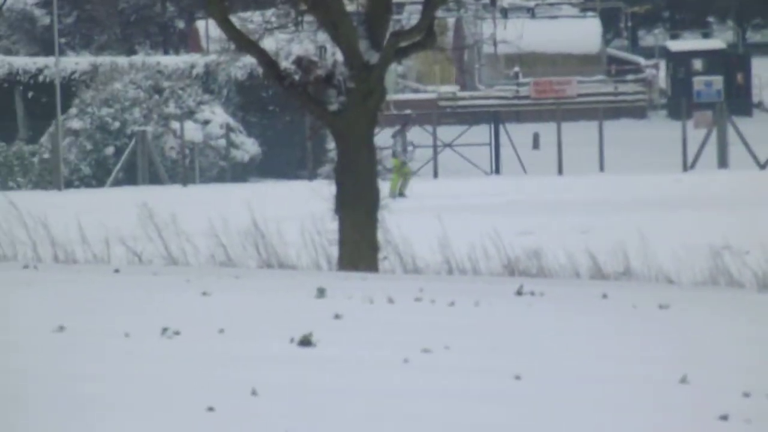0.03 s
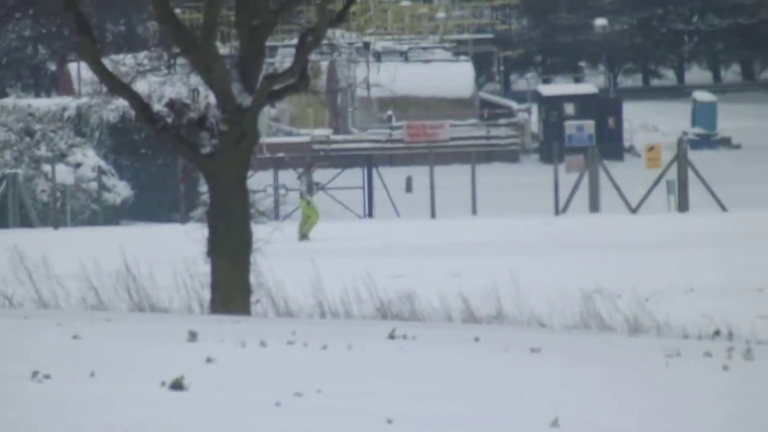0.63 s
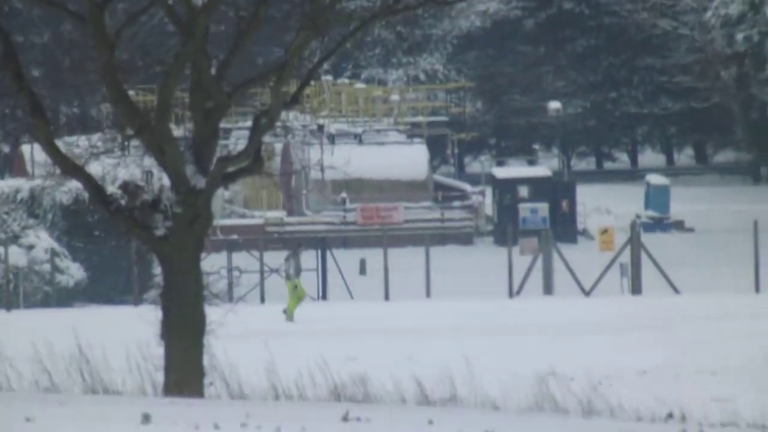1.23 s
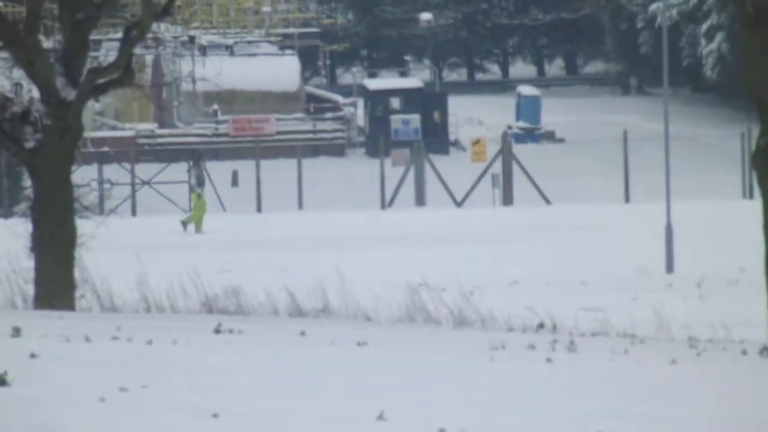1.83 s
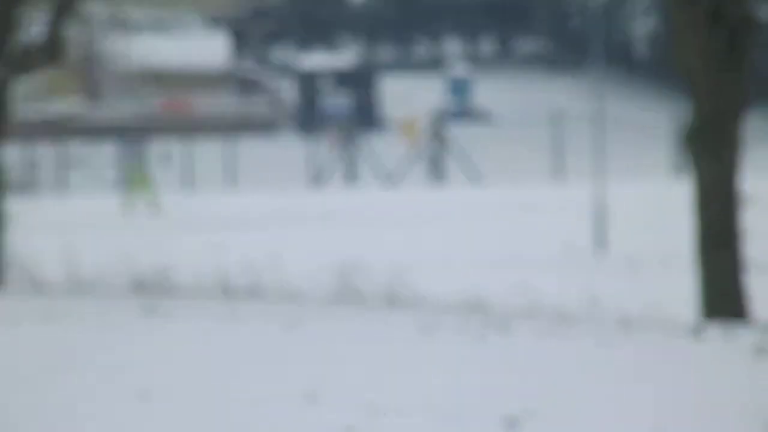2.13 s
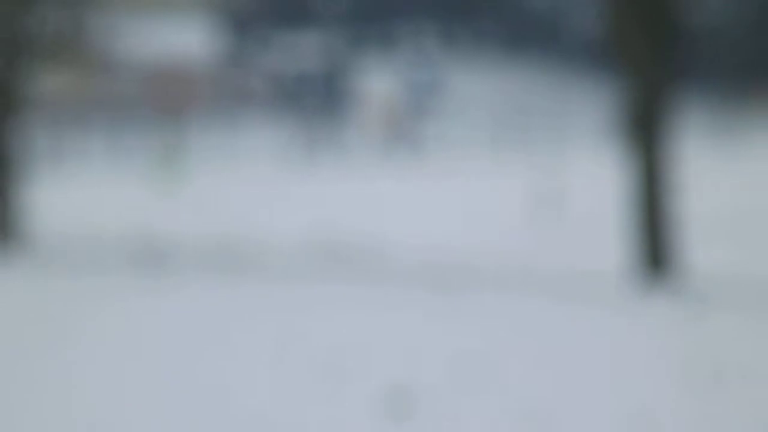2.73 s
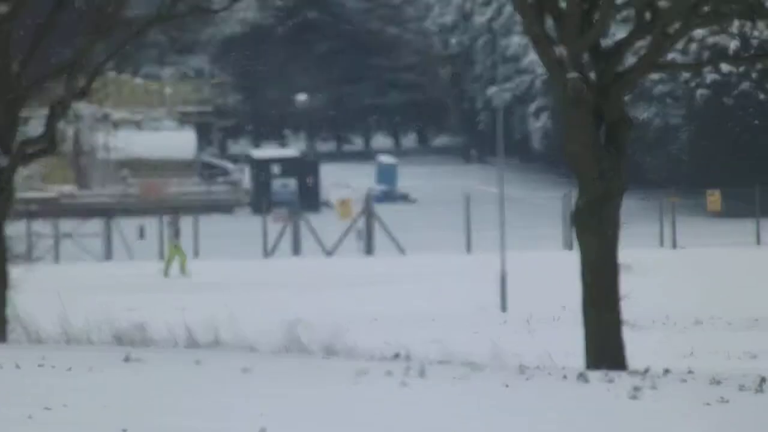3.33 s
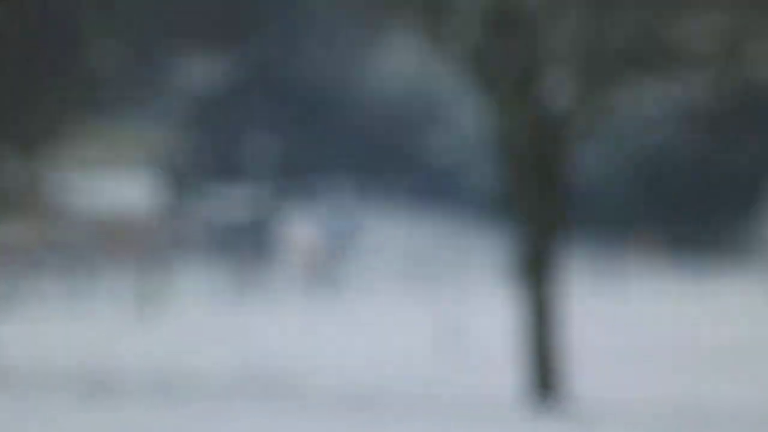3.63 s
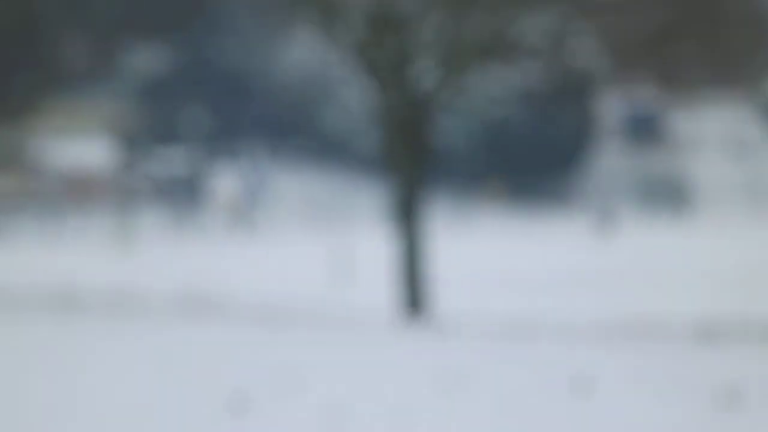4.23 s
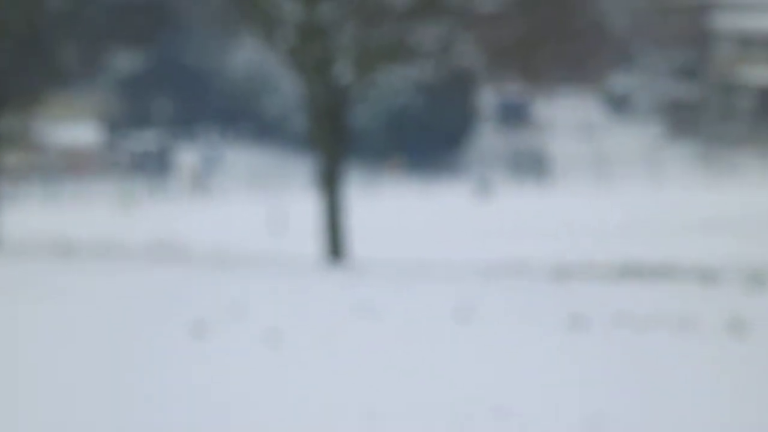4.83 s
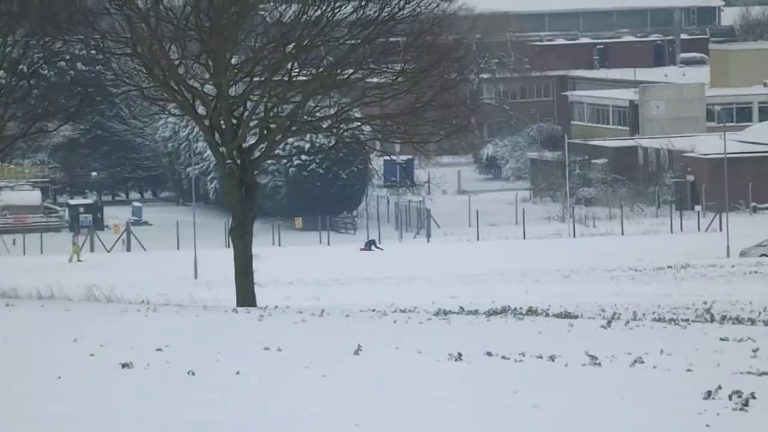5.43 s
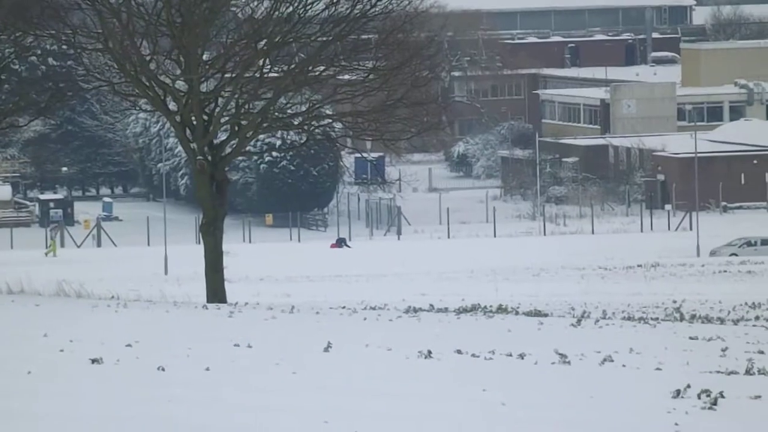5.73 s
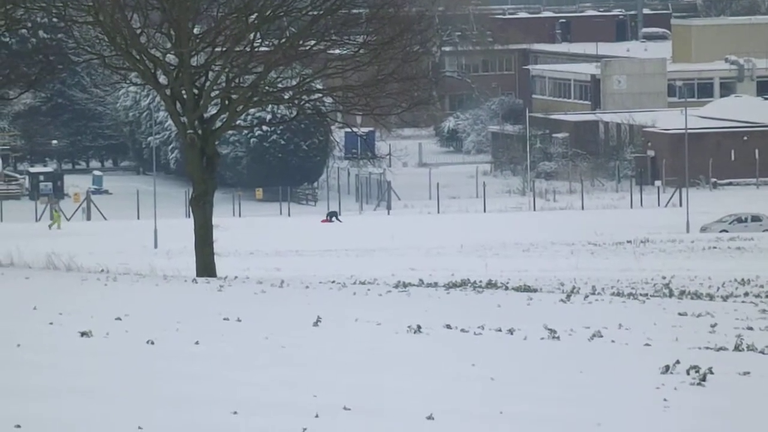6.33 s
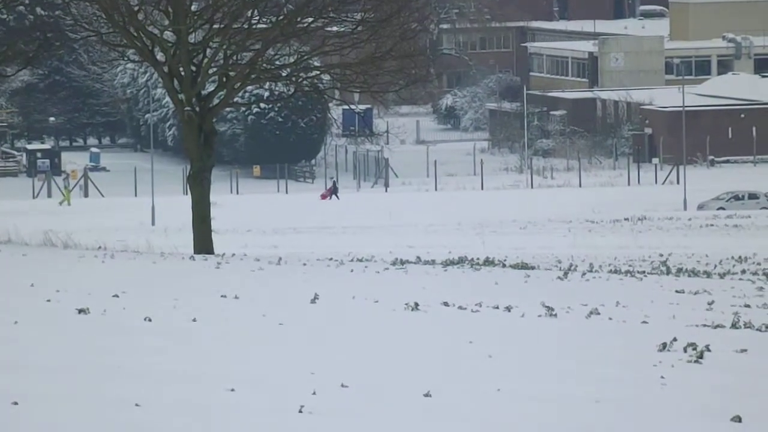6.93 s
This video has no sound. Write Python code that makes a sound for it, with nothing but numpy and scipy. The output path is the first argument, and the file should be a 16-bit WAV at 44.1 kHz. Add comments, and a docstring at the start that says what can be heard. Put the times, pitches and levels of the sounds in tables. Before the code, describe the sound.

A steady hiss with a faint hum runs throughout. A camera button clicks down and up, followed by light taps on the case. The focus motor buzzes briefly, then the zoom motor starts with a knock and whirrs. Two more short buzzes lead into a longer, rattling zoom that rubs harder and clacks against its stop. One small buzz follows. Everything is very close, heard through the camera's own case outdoors.

```python
"""A steady hiss, a button click, then the buzz, whirr and rattle of a compact camera's lens at work.
The camera hears itself through its case while it films a snowy field. A stepper motor buzzes the
focus once per frame, a geared motor whirrs the zoom, and a loose wheel chatters across its play.
The lens carriage knocks as it starts or halts; at last the barrel rubs tight and hits its end stop."""
import sys
import numpy as np
from scipy import signal
from scipy.fft import rfft, irfft
from scipy.io import wavfile
from scipy.ndimage import uniform_filter1d

SR = 44100
rng = np.random.default_rng(int(sys.argv[2]) if len(sys.argv) > 2 else 0)


def waveform_to_disk(signal):
    """Save audio, clipped to [-1, 1], as 16-bit WAV at the path in sys.argv[1]."""
    frames = np.transpose(np.atleast_2d(signal))
    scaled = np.clip(frames, -1, 1) * 32767
    samples = np.round(scaled).astype(np.int16)
    wavfile.write(sys.argv[1], SR, samples)


N = 317520
TIME = np.arange(N) / SR

# resonances of the microphone port and the case around it (frequency [Hz], width [Hz], lift [dB])
PORT_MODES = [(260, 35, 5), (396, 66, 3.5), (982, 258, 24.5), (2433, 115, 4), (3140, 380, 8),
              (3910, 337, 16.5), (4980, 520, 7), (6840, 97, 9), (8620, 740, 11), (9850, 1720, 8)]
# resonances of the case under the fingers (frequency [Hz], width [Hz], lift [dB])
CASE_MODES = [(982, 280, 22.5), (1173, 49, 13), (3740, 200, 5)]
# resonances of the lens barrel (frequency [Hz], width [Hz], lift [dB])
BARREL_MODES = [(997, 170, 22.5), (1230, 34, 6.5), (1330, 64, -6.5), (1560, 200, 2.5), (1740, 92, -7.5),
                (2053, 77, 4), (2180, 99, -10.5), (3096, 2330, 27.5), (3715, 140, -9.5), (3994, 93, 0.5),
                (4600, 300, -3.5), (4980, 190, 4), (5390, 140, 6), (8250, 820, 15), (9680, 610, 16)]
# runs of the focus motor (start [s], end [s], level [dB], peak of the tick at each end [dB])
FOCUS_RUNS = [(2.022, 2.28, -27.5, -19.5), (2.984, 3.154, -33, -22), (3.303, 3.485, -29.5, -21.5),
              (5.304, 5.387, -34.5, -20)]
# force spectrum of the loose wheel's strikes (frequency [Hz], level [dB])
WHEEL_FORCE = [(300, -42), (1500, -26.5), (2700, -22), (2980, -1), (3100, -3.5), (3175, 1.5), (3260, 3.5),
               (3420, -19), (3750, -0.5), (4500, -19), (6400, -19.5), (9700, -18.5), (15000, -42)]


def undb(db):
    """Decibels to gain."""
    return 10 ** (np.asarray(db) / 20)


def unit(x):
    """Scale to rms 1."""
    return x / np.sqrt(np.mean(x ** 2))


def walk(rate_hz):
    """Random drift with rms 1 that takes a new turn rate_hz times a second."""
    return unit(np.interp(TIME * rate_hz, np.arange(N), rng.standard_normal(N)))


def fader(rows):
    """Gain that follows (time [s], level [dB]) rows and holds at both ends."""
    return undb(np.interp(TIME, *np.transpose(rows)))


def envelope(rows):
    """Smoothed gain along (time [s], level [dB]) rows, silent outside them."""
    db = np.interp(TIME, *np.transpose(rows), left=-200, right=-200)
    return uniform_filter1d(undb(db), size=130)


def running(start, end, attack_s, release_s):
    """Gain of something that comes up to speed, holds and runs down."""
    attack = 1 - np.exp(-np.maximum(TIME - start, 0) / attack_s)
    return attack * np.exp(-np.maximum(TIME - end, 0) / release_s)


def swells(rows):
    """Gain of bell-shaped swells from (time [s], length [s], level [dB]) rows."""
    return sum(undb(db) * np.exp(-(2 * (TIME - s) / length) ** 2) for s, length, db in rows)


def ride_band(x, kind, hz, gain):
    """Ride the gain of one frequency band and leave the rest alone."""
    band = signal.sosfiltfilt(signal.butter(2, hz, kind, fs=SR, output="sos"), x)
    return x + band * (gain - 1)


def response(force, modes, size=4096):
    """Impulse response of a force spectrum lifted by a body's resonances."""
    hz = np.arange(size // 2 + 1) * SR / size + 1
    force_hz, force_db = np.transpose(force)
    db = np.interp(np.log(hz), np.log(force_hz), force_db)
    db += sum(lift / (1 + (2 * (hz - centre) / width) ** 2) for centre, width, lift in modes)
    # minimum phase: the ring follows the hit
    cepstrum = irfft(np.log(undb(db)))
    cepstrum[1:size // 2] *= 2
    cepstrum[size // 2 + 1:] = 0
    return irfft(np.exp(rfft(cepstrum)))


def ring(drive, force, modes):
    """Pass an excitation through a body; rms 1."""
    return unit(signal.fftconvolve(drive, response(force, modes))[:N])


def pulses(times, sizes):
    """Clicks placed between samples by a short windowed sinc."""
    out = np.zeros(N)
    index = (times * SR).astype(int)[:, None] + np.arange(-3, 5)
    offset = index - times[:, None] * SR
    np.add.at(out, index % N, sizes[:, None] * np.sinc(offset) * np.sinc(offset / 4))
    return out


def blows(hits, force, modes, scrape, rise_s, size=2048):
    """Each blow is a click and a dying chatter of the contact, ringing a body."""
    out, impulse = np.zeros(N), response(force, modes)
    for s, db, decay in hits:
        chatter = np.exp(-TIME[:size] / decay) * (1 - np.exp(-TIME[:size] / rise_s))
        contact = scrape * rng.standard_normal(size) * chatter
        contact[0] += 1
        sound = signal.fftconvolve(contact, impulse)
        start = int(s * SR)
        out[start:start + len(sound)] += undb(db) * sound / np.abs(sound).max()
    return out


def snaps(hits, force, modes, width_hz, lift_db, scrape, rise_s):
    """Blows whose main resonance moves with the place of contact."""
    return sum(blows([(s, db, decay)], force, modes + [(hz, width_hz, lift_db)], scrape, rise_s)
               for s, db, decay, hz in hits)


def port_hiss(rumble_hz=90, gust_db=3.5, flutter_hz=(850, 1150), flutter_db=2.2):
    """Hiss coloured by the microphone port; its rumble swells unevenly and its mids flutter."""
    # noise spectrum that drives the port (frequency [Hz], level [dB])
    spectrum = [(10, -7.5), (27, 1), (58, 2.5), (80, -5), (110, -2.5), (150, -7.5), (300, -5), (450, -13),
                (560, -10.5), (700, -16), (1700, -11), (2800, -2), (4400, -10.5), (5700, -6), (6400, -16),
                (10000, -25.5), (15000, -26.5)]
    # base level of the hiss (time [s], level [dB])
    level = [(0, -41.5), (.9, -39.5), (1.25, -39.5), (1.6, -39), (3.2, -38.5), (5.5, -39), (7.2, -39.5)]
    # the band around 3 kHz against the rest (time [s], lift [dB])
    presence = [(.55, 5), (.65, 5.5), (1.0, 3), (1.08, 1), (1.44, -2), (1.52, 3), (5.5, 3), (6.1, 1.5),
                (6.7, 2.5), (7.0, 4)]
    noise = rng.standard_normal(N) * undb(.5 * walk(9.9))
    hiss = envelope(level) * ring(noise, spectrum, PORT_MODES)
    hiss = ride_band(hiss, "bandpass", (2400, 3700), fader(presence))
    hiss = ride_band(hiss, "lowpass", rumble_hz, undb(gust_db * walk(11)))
    return ride_band(hiss, "bandpass", flutter_hz, unit(undb(flutter_db * walk(22))))


def hums(flutter_db=3, drift_rad=.98, whistle_hz=8021, coil_hz=93.7):
    """Faint tones waver, a thin electrical whistle comes and goes, and the iris coil hums."""
    # constant hums and tones (frequency [Hz], mean level [dB])
    partials = [(27, -57), (49, -60), (100, -67), (224, -67.5), (278, -66), (288, -58.5), (372, -69.5),
                (415, -71.5), (467, -69.5), (480, -66.5), (8021, -65.5)]
    # swells of the whistle (time [s], length [s], level [dB])
    whistles = [(.523, .04, -55), (.62, .033, -52), (1.04, 0.047, -55), (1.5, 0.18, -60)]
    # spells of current in the iris coil (start [s], end [s], level [dB])
    coil_spells = [(.5, 2.45, -54.5), (2.82, 4.72, -56)]
    tones = 0
    for hz, db in partials:
        level = undb(db + flutter_db * walk(6.2))
        tones += level * np.sin(2 * np.pi * hz * TIME + drift_rad * walk(6.7))
    whistle = swells(whistles) * np.sin(2 * np.pi * whistle_hz * TIME)
    current = sum(undb(db) * running(start, end, .011, .04) for start, end, db in coil_spells)
    coil = current * undb(walk(6.7)) * np.sin(2 * np.pi * coil_hz * TIME)
    return np.sqrt(2) * (tones + whistle + coil)  # the levels above are rms


def barrel_creep(start_s=.516, end_s=4, level_db=-45.5, fade_db_per_s=1):
    """The barrel slides slowly: a faint, grainy rustle in the case, ever quieter."""
    # force spectrum of the sliding (frequency [Hz], level [dB])
    force = [(150, -10), (300, 5), (700, -14), (1000, -.5), (1300, 5.5), (1900, -6.5), (2800, 2),
             (5600, -4), (6500, -20), (10000, -26), (15000, -22)]
    # scuffs along the way (time [s], length [s], level [dB])
    scuffs = [(.62, 0.02, -47), (.81, 0.11, -41.5), (1.415, 0.016, -38)]
    sliding = running(start_s, end_s, .022, .0196) * undb(level_db - fade_db_per_s * (TIME - start_s))
    grain = rng.standard_normal(N) * undb(2.5 * walk(250))
    return ring(grain, force, PORT_MODES) * (sliding + swells(scuffs))


def button():
    """A button clicks down brightly and pings as it comes up."""
    # force spectrum of the click (frequency [Hz], level [dB])
    force = [(150, -12), (700, -22), (1700, -3), (2800, 3), (4400, 5.5), (5600, 1), (6500, -6), (8300, -2),
             (10500, -19), (15000, -40)]
    # press and release (time [s], peak [dB], decay [s], ring [Hz], lift of the ring [dB])
    clicks = [(0.5327, -13.5, 0.0017, 3250, 16), (0.58, -16, 0.002, 3460, 21.5)]
    return sum(snaps([hit], force, CASE_MODES, width_hz=280, lift_db=lift, scrape=1.1, rise_s=.0007)
               for *hit, lift in clicks)


def case_taps():
    """A finger or the settling lens taps the case and rings it lightly."""
    # force spectrum of a tap (frequency [Hz], level [dB])
    force = [(40, -35), (150, -18), (400, -11), (700, -7), (1100, 0), (1700, -13), (3200, 5), (4500, -23),
             (15000, -59)]
    # taps (time [s], peak [dB], decay [s])
    hits = [(.5345, -20, 0.0016), (.9635, -21, 0.0015), (1.399, -29, 0.0066), (5.306, -29.5, 0.0065),
            (5.388, -37, 0.0066)]
    return blows(hits, force, CASE_MODES, scrape=.49, rise_s=.00065)


def focus_motor(frame_hz=59.55, step_hz=528, steps_per_frame=8, jitter_s=.000022, limp_db=6,
                inertia_hz=3700, brake_db=7, scrape_s=.00085, grit_db=-6):
    """A stepper fires a packet of steps every frame: a buzz whose lines lie one frame rate apart."""
    # force spectrum of a step (frequency [Hz], level [dB])
    force = [(150, 6), (700, -16), (1100, -1), (1900, -10), (2400, 12.5), (3000, 7.5), (4100, 1.5),
             (5600, 4), (6500, -8), (8400, -18.5), (9700, -6), (15000, -43)]
    # resonances of the motor's bracket (frequency [Hz], width [Hz], lift [dB])
    bracket_modes = [(1116, 710, 15.5), (1580, 200, 2), (2830, 60, 12), (3228, 176, 18), (3553, 360, 22),
                     (3880, 240, 10), (4434, 180, 18.5), (5600, 1500, 9), (8380, 850, 30)]
    frames = np.arange(int(TIME[-1] * frame_hz)) / frame_hz
    times = (frames[:, None] + np.arange(steps_per_frame) / step_hz).ravel()
    slip, scatter_db = rng.standard_normal((len(times), 2)).T
    # the two coils pull unequally, so strong and weak steps alternate
    weak = np.arange(len(times)) % 2
    steps = pulses(times + jitter_s * slip, undb(scatter_db - limp_db * weak))
    # the rotor's inertia rounds each step
    buzz = signal.sosfilt(signal.butter(4, inertia_hz, fs=SR, output="sos"), unit(steps))
    # the lead screw scrapes after each step, most where the packet brakes
    brakes = pulses(times[steps_per_frame - 1::steps_per_frame], np.ones(len(frames)))
    jolts = np.abs(steps) + undb(brake_db) * np.abs(brakes)
    grit = signal.lfilter([1], [1, -np.exp(-1 / (scrape_s * SR))], jolts) * rng.standard_normal(N)
    drive = (buzz + undb(grit_db) * unit(grit)) * undb(1.2 * walk(70))
    runs = sum(undb(db) * running(start, end, .0073, .01) for start, end, db, _ in FOCUS_RUNS)
    return ring(drive, force, bracket_modes) * runs


def focus_nut(tick_decay_s=.0024):
    """The nut ticks on its screw as each focus run starts and ends, and sizzles at each small nudge."""
    # resonances of the nut (frequency [Hz], width [Hz], lift [dB])
    nut_modes = [(1010, 194, 25), (4800, 310, 11), (6060, 190, 12), (7450, 550, -8), (8130, 330, 11.5),
                 (8680, 530, 12)]
    # force spectra of a tick and a nudge (frequency [Hz], level [dB])
    tick_force = [(150, -21), (700, -3), (1300, -2), (2000, 5), (3000, 6.5), (3550, 22), (4200, 5),
                  (6000, -1.5), (8500, -6), (10500, -10), (15000, -33)]
    nudge_force = [(150, -25), (700, -15), (1800, -25), (2600, 4), (4400, 1.5), (6000, -5.5), (8500, -8),
                   (10000, -17), (15000, -47)]
    # lone ticks of the lens drive (time [s], peak [dB], decay [s])
    lone_ticks = [(2.3035, -16.5, 0.0032), (2.3235, -17, 0.0015), (3.511, -17, 0.0024)]
    # nudges of the focus (time [s], peak [dB], decay [s], ring [Hz])
    nudges = [(2.059, -25, .003, 3520), (2.996, -19.5, 0.0033, 3280), (3.014, -29, .004, 3350),
              (3.046, -28, 0.0034, 3280), (3.0635, -19.5, 0.0044, 3200), (3.115, -20, 0.002, 3200),
              (3.318, -26, .002, 3580), (3.3505, -20, 0.0012, 3600), (3.3695, -24, .002, 3500),
              (3.436, -20, 0.0018, 3600), (5.321, -18, 0.0052, 3640), (5.341, -19.5, 0.0029, 3740),
              (5.372, -21, .004, 3720)]
    run_ticks = [(s, db, tick_decay_s) for start, end, _, db in FOCUS_RUNS for s in (start, end)]
    sizzle = snaps(nudges, nudge_force, nut_modes, width_hz=680, lift_db=18, scrape=.91, rise_s=.0036)
    return sizzle + blows(lone_ticks + run_ticks, tick_force, nut_modes, scrape=.62, rise_s=.0012)


def zoom_motor(mesh_hz=590, shaft_hz=146, jitter_s=.000263, wobble=.17, gear_lag_s=.043,
               tight_s=4.9, rub_db=-23.5, rise_db_per_s=114, ease_db_per_s=9, duck_db=-1):
    """Gear teeth strike unevenly and slide, driving a barrel that rubs in its sleeve."""
    # force spectra of the gears and of the rubbing (frequency [Hz], level [dB])
    gear_force = [(50, -30), (150, -0.5), (350, -6), (700, -14), (1000, -10), (1350, -0.5), (2000, -8),
                  (2500, -9), (3200, -2.5), (3800, -2.5), (5600, 1), (6400, -6), (9700, -15), (11500, -19),
                  (15000, -48)]
    rub_force = [(20, -36), (70, -4), (150, 1), (400, -1), (700, -12), (1700, -24), (3000, -3.5),
                 (5300, -10), (6400, -9), (8000, -14), (15000, -50)]
    # resonances of the sleeve (frequency [Hz], width [Hz], lift [dB])
    sleeve_modes = [(2430, 1140, 19), (3330, 590, 20.5), (3920, 420, 11), (4270, 340, 13), (4900, 520, 21),
                    (5200, 290, 9.5)]
    # stiff spots where the barrel rubs briefly (time [s], length [s], level [dB])
    stiff_spots = [(3.83, 0.12, -32), (4.68, 0.06, -36)]
    # zoom runs (start [s], end [s], gain of whirr and chatter [dB])
    runs = [(2.323, 2.803, -26), (3.46, 5.133, -28)]
    slip, scatter = rng.standard_normal((int(TIME[-1] * mesh_hz), 2)).T
    teeth = pulses(np.arange(len(slip)) / mesh_hz + jitter_s * slip, undb(2 * scatter))
    teeth -= uniform_filter1d(teeth, size=75)  # thin out the lows
    # the load swings once per shaft turn
    shaft_angle = 2 * np.pi * np.cumsum(shaft_hz * (1 + .0438 * walk(5))) / SR
    load = (1 + wobble * np.sin(shaft_angle)) * undb(walk(90))
    whirr = ring((.5 * unit(teeth) + rng.standard_normal(N)) * load, gear_force, BARREL_MODES)
    chatter = wheel_chatter()
    # near the wide end the barrel rubs ever harder until it is tight, then slowly eases
    past_tight_s = TIME - tight_s
    tightness_db = np.minimum(rise_db_per_s * past_tight_s, -ease_db_per_s * past_tight_s)
    friction = undb(rub_db + tightness_db) + swells(stiff_spots)
    rub = ring(rng.standard_normal(N) * load, rub_force, sleeve_modes) * friction
    # the gears whirr less once the tight barrel holds them against their play
    grip = undb(rise_db_per_s * np.minimum(past_tight_s, 0))
    whirr *= undb(duck_db * grip)
    out = 0
    for start, end, db in runs:
        # the whirr sets in only once the play is taken up
        gears = whirr * running(start + gear_lag_s, end, .041, .01) + chatter
        out += running(start, end, attack_s=.046, release_s=.003) * (undb(db) * gears + rub)
    return out


def wheel_chatter(shortest_s=.0022, spread_s=.0025, scatter_db=2.2):
    """The loose wheel bounces every few milliseconds, ringing the barrel's main resonance."""
    # chatter against the gears (time [s], level [dB])
    level = [(2.36, 3.5), (2.43, -3), (2.48, 3.5), (2.6, -20), (3.55, -12), (3.72, 0.5), (3.92, -12),
             (4.02, 0.5), (4.1, 2.5), (4.17, -8.5), (4.38, 2), (4.46, -2), (4.66, 6.5), (4.74, 0.5),
             (5.12, -3)]
    gaps = shortest_s + spread_s * rng.random(N // 70)
    sizes = undb(scatter_db * np.clip(rng.standard_normal(len(gaps)), -2, 2))
    times = np.cumsum(gaps)
    heard = times < TIME[-1]
    return ring(pulses(times[heard], sizes[heard]), WHEEL_FORCE, BARREL_MODES) * fader(level)


def carriage_knocks():
    """The lens carriage knocks and bounces in the barrel as it starts or halts."""
    # force spectrum of a knock (frequency [Hz], level [dB])
    force = [(50, -24), (150, 8), (700, -0.5), (1500, -2), (2400, -4.5), (3200, -8), (4200, 1.5),
             (5300, 2.5), (6500, -7), (9700, -16), (12000, -36), (15000, -60)]
    # knocks and bounces (time [s], peak [dB], decay [s], ring [Hz])
    hits = [(2.3292, -5, 0.00042, 2950), (2.333, -10, 0.00092, 3220), (2.3366, -5, 0.0016, 3750),
            (2.3385, -3.5, 0.001, 3360), (2.3496, -11, .00089, 3250), (2.8788, -13, .002, 3080),
            (2.8815, -10, 0.0035, 3200), (2.8838, -11, 0.0014, 4150), (2.8865, -11, 0.0054, 3230),
            (3.5342, -12, 0.0044, 3100), (3.54, -11, 0.0017, 3230), (3.544, -12, 0.006, 3260)]
    return snaps(hits, force, BARREL_MODES, width_hz=590, lift_db=11.5, scrape=.8, rise_s=.00054)


def gear_thuds():
    """The gear train thuds dully as it takes up its load."""
    # force spectrum of a thud (frequency [Hz], level [dB])
    force = [(60, -28), (150, -15.5), (250, 4.5), (380, 1.5), (520, -11), (720, -9.5), (1150, -7.5),
             (1500, -14), (3000, -28), (8000, -76), (15000, -104)]
    # thuds (time [s], peak [dB], decay [s])
    hits = [(2.340, -8.5, 0.0015), (2.348, -12, 0.0019), (2.356, -16.5, 0.0017), (2.884, -31, 0.0035),
            (3.536, -13.5, 0.0065), (5.21, -27, 0.0067)]
    return blows(hits, force, BARREL_MODES, scrape=.44, rise_s=.00036)


def wheel_rattles(gain_db=.5):
    """The loose wheel strikes across its play and rings the barrel."""
    # its clearest strikes and rebounds (time [s], relative peak [dB], decay [s])
    hits = [(2.4722, -14, 0.0033), (2.5325, -15, .001), (2.5436, -16, .001), (2.6815, -19, 0.0011),
            (2.7572, -17, 0.0017), (2.7618, -16, .002), (2.8025, -11.5, 0.0016), (3.6689, -17, 0.0026),
            (3.7, -16, .001), (3.7115, -15, .001), (3.7868, -15, .005), (3.847, -15, 0.00079),
            (3.8588, -15, .001), (3.8965, -14, 0.0027), (3.9553, -12.5, 0.0048), (3.9975, -14, .001),
            (4.0435, -13, 0.0014), (4.0768, -16, 0.0035), (4.1345, -10.5, 0.0019), (4.147, -18, .0015),
            (4.187, -13, 0.0018), (4.2452, -12, 0.0035), (4.2865, -13, .001), (4.3326, -13, .0015),
            (4.365, -11, .004), (4.4235, -11, 0.0019), (4.4362, -11.5, 0.0011), (4.475, -11.5, 0.0022),
            (4.5329, -8.5, .004), (4.6085, -11, 0.00081), (4.651, -13, .001), (4.6918, -15, .002),
            (4.7066, -14, .0007), (4.7092, -9.5, 0.00078), (4.755, -7.5, 0.00091), (4.8142, -7, .0008),
            (4.8175, -12, 0.00087), (4.924, -11, .003), (4.952, -13, 0.00088), (4.9774, -15, .003),
            (4.9945, -11.5, .001), (5.1036, -17, 0.0023)]
    return undb(gain_db) * blows(hits, WHEEL_FORCE, BARREL_MODES, scrape=.26, rise_s=.00055)


def end_stop():
    """The barrel runs into its end stop and bounces with a thin ring."""
    # force spectrum of the impact (frequency [Hz], level [dB])
    force = [(60, -21), (150, -6), (700, -7), (1000, -6), (1250, 2), (1550, -7), (1850, 1.5), (2400, -1),
             (3200, -10), (4200, 5.5), (5200, -2), (6500, -3.5), (9700, -29), (15000, -45)]
    # impact and bounces (time [s], peak [dB], decay [s], ring [Hz])
    hits = [(5.2006, -16, .001, 3200), (5.2036, -8, 0.0027, 3700), (5.2083, -5.5, 0.0024, 3020),
            (5.2148, -8, .002, 1850), (5.2175, -4.5, 0.00083, 3340), (5.221, -21, 0.0068, 3100)]
    return snaps(hits, force, BARREL_MODES, width_hz=970, lift_db=9, scrape=.47, rise_s=.00038)


def scene():
    """All the lens sounds reach one microphone through the case."""
    bed = port_hiss() + hums() + barrel_creep()
    handling = button() + case_taps()
    focus = focus_motor() + focus_nut()
    zoom = zoom_motor() + carriage_knocks() + gear_thuds() + wheel_rattles() + end_stop()
    sound = bed + handling + focus + zoom
    return np.array([sound, sound])


def record(dry, top_hz=15850):
    """The left channel lags by one sample; the top is cut steeply."""
    skewed = np.array([np.append(0, dry[0, :-1]), dry[1]])
    return signal.sosfilt(signal.ellip(10, .1, 70, top_hz, fs=SR, output="sos"), skewed)


dry = scene()
out = record(dry)
waveform_to_disk(out)
```